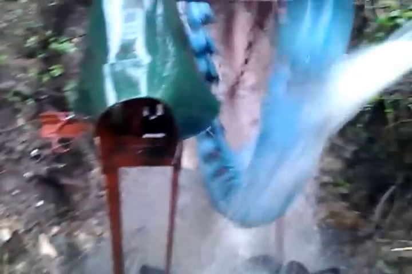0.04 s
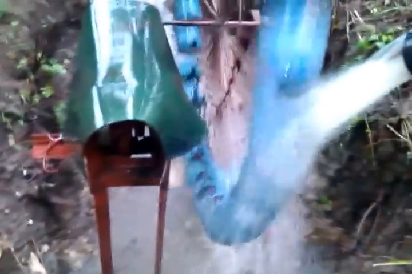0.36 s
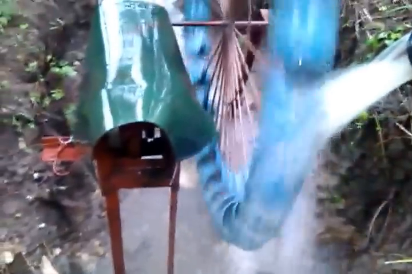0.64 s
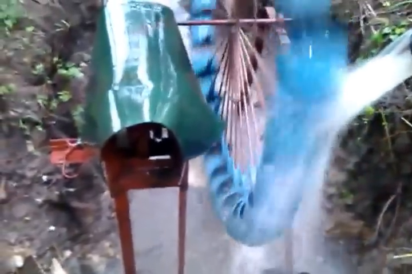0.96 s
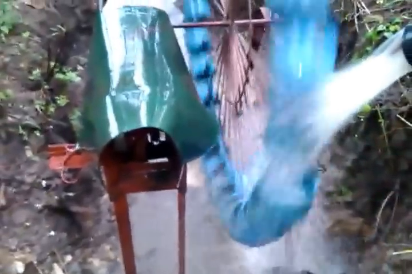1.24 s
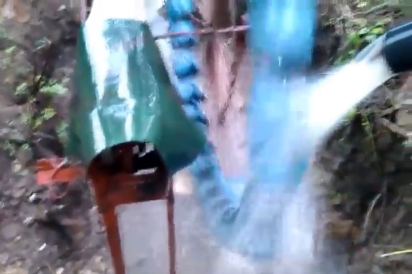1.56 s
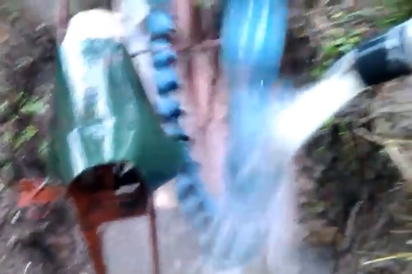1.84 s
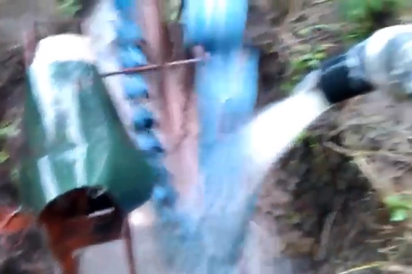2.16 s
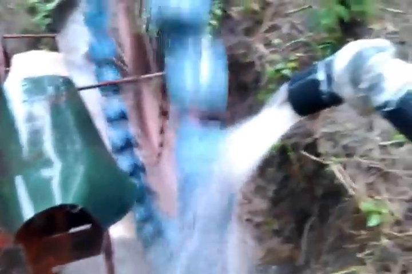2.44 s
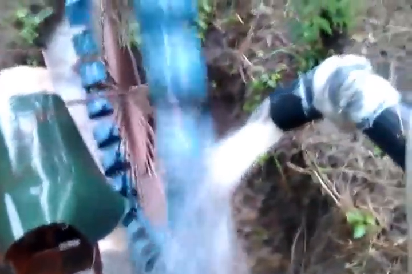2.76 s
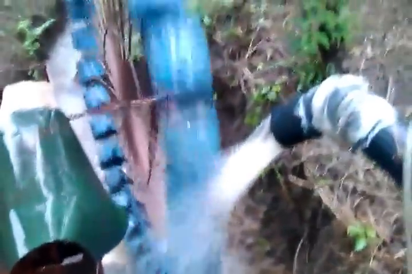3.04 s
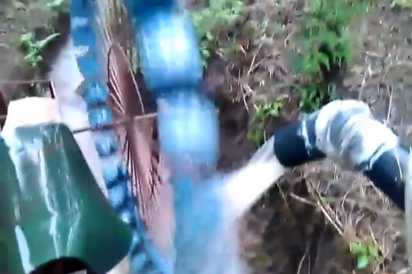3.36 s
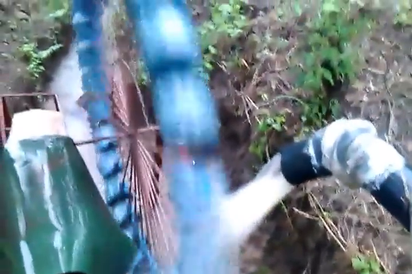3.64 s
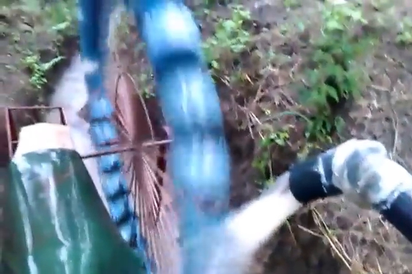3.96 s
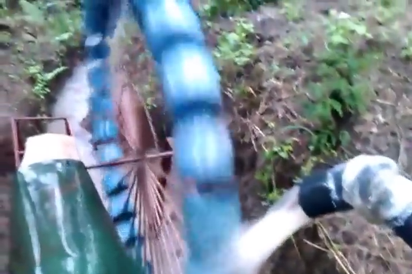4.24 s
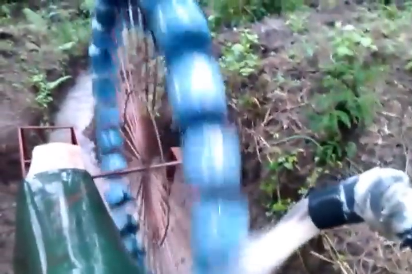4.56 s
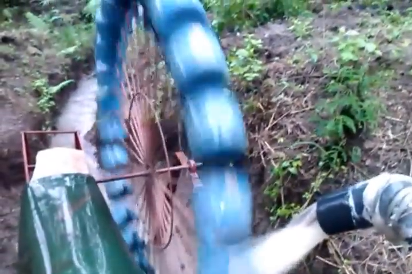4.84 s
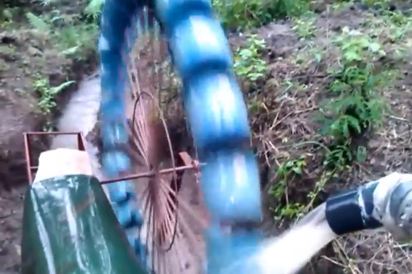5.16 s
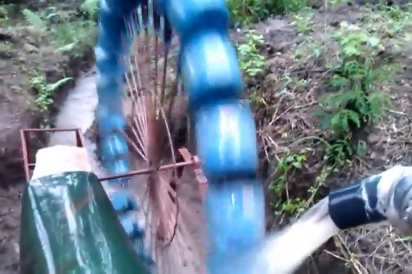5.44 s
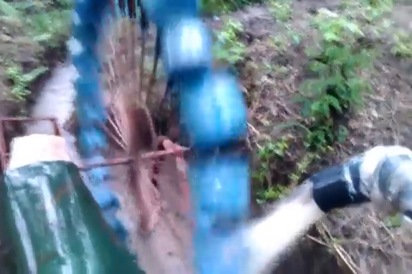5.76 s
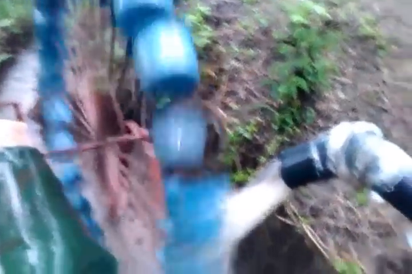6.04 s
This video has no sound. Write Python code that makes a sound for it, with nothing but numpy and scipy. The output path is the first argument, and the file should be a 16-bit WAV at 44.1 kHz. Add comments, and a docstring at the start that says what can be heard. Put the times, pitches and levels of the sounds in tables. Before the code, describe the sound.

After a brief silence, gushing water hits a turning bucket wheel close by, making a fast, pulsing splash with bubbling underneath and a barely audible generator hum. A few sharp handling clicks and a dull bump come about two seconds in, and the splashing changes tone as the microphone moves above the wheel. Outdoor wind buffets it now and then. Several big drops smack toward the end, along with a last tick.

```python
"""Outdoors, a thick water jet gushes from a pipe onto the buckets of a wheel driving a small generator.
After 0.65 s of silence, the buckets cut the jet about 5.4 times a second: spray hisses, each cup
rings and spent water churns below, over a faint hum. Around 2 s the hand-held camera ticks and bumps,
then climbs from beside the wheel to above it, and the water's tone shifts. Gusts buffet the
microphone, hardest at 5 s. Near the end, a few large drops smack and the camera ticks once more."""
import sys
import numpy as np
from scipy import signal
from scipy.fft import rfft, irfft
from scipy.io import wavfile
from scipy.ndimage import uniform_filter1d

SR = 44100
rng = np.random.default_rng(int(sys.argv[2]) if len(sys.argv) > 2 else 0)


def unload_wav(signal):
    """Save mono or channel-first audio to the path in sys.argv[1] as 16-bit WAV at rate SR, clipped to [-1, 1]."""
    wavfile.write(
        sys.argv[1],
        SR,
        np.round(np.clip(np.atleast_2d(signal).T, -1, 1) * 32767).astype(np.int16),
    )


N = 273420
TIME = np.arange(N) / SR
EDGE_HZ = 7290  # the highest pitch the microphone picks up

# The tone of flying spray. Each row: frequency in Hz, level in dB.
SPRAY_TONE = [(300, -21.5), (1100, -10.5), (1600, -7), (3400, -2.5), (4000, -3), (4700, -4.5), (5500, -0.5),
              (6100, -1.5), (6900, 1.5), (7300, -7.5)]


def gain_of(db):
    """Turns decibels into a number to multiply a sound by."""
    return 10 ** (np.asarray(db) / 20)


def evened(x):
    """Scales a signal so that its average strength (rms) is 1."""
    return x / np.sqrt(np.mean(x ** 2) + 1e-20)


def curves(rows):
    """Joins rows that start with a time in seconds into one curve for each other column."""
    times, *columns = np.transpose(rows)
    return [np.interp(TIME, times, column) for column in columns]


def add(mix, start_s, sound):
    """Mixes a sound in at the given time."""
    part = mix[round(start_s * SR):][:len(sound)]
    part += sound[:len(part)]


def coloured(x, tone):
    """Shapes a sound by rows of Hz and dB, cuts it at the microphone's edge and evens it."""
    hz = np.fft.rfftfreq(N, 1 / SR)
    tone_hz, tone_db = np.transpose(tone)
    gain = gain_of(np.interp(np.log(hz + 1), np.log(tone_hz), tone_db))
    return evened(irfft(rfft(x) * gain * (hz < EDGE_HZ), N))


def wander(rate_hz):
    """A smooth random drift of strength 1, mostly slower than the given rate."""
    hz = np.fft.rfftfreq(N, 1 / SR)
    return evened(irfft(rfft(rng.standard_normal(N)) * (hz > 0) / (1 + (hz / rate_hz) ** 4), N))


def resonate(x, hz, width_hz):
    """Makes a sound ring around a pitch, which may move."""
    turn = np.exp(2j * np.pi * np.cumsum(hz * np.ones(len(x))) / SR)
    fade = np.exp(-np.pi * width_hz / SR)
    return 2 * (turn * signal.lfilter([1 - fade], [1, -fade], x / turn)).real


def impacts(per_s, spread_db):
    """Tiny hits at random times, most small and a few large."""
    size = gain_of(spread_db * np.minimum(rng.exponential(1, N), 4))
    return evened(size * rng.choice([-1, 1], N) * (rng.random(N) < per_s / SR))


def by_position(beside, above):
    """Slides from one value toward the other as the camera climbs."""
    # Each row: time in seconds, camera position (0 is beside the wheel, 1 is above it).
    climb = [(1.9, 0), (2.7, 0.53), (3.5, 0.9)]
    return beside + (above - beside) * curves(climb)[0]


def bucket_pulse(between_db, rise_s, hold_s, delay_s):
    """The wheel's beat: each bucket enters the jet fast and leaves slowly; some water splashes between."""
    # Each row: time in seconds, buckets passing per second.
    wheel_speed = [(0.66, 5.48), (1.25, 5.844), (1.6, 5.448), (3.65, 5.456), (4.05, 4.784), (4.5, 5.72),
                   (6.2, 5.18)]
    passed = np.cumsum(curves(wheel_speed)[0]) / SR
    passed -= np.interp(0.673, TIME, passed)  # one bucket enters at 0.673 s
    age = np.arange(round(SR / 2)) / SR
    blow = (1 - np.exp(-age / rise_s)) * np.exp(-(age / hold_s) ** 2)
    power = np.full(N, gain_of(between_db) ** 2)
    for entry_s in TIME[1:][np.diff(np.floor(passed)) > 0]:
        add(power, entry_s + delay_s, blow ** 2)
    return evened(np.sqrt(power))


def generator(base_hz):
    """The generator hums faintly, its pitch wavering a little."""
    # Each row: multiple of the base pitch, level in dB.
    hum_notes = [(2, -55), (3, -51), (4, -54)]
    cycles = np.cumsum(base_hz * (1 + 0.011 * wander(rate_hz=5))) / SR
    return sum(gain_of(db) * evened(np.sin(2 * np.pi * multiple * cycles)) for multiple, db in hum_notes)


def wind():
    """Moving air rumbles on the microphone: a light breeze, and gusts that swell and fade."""
    # Each row: frequency in Hz, level of the rumble in dB.
    rumble_tone = [(8, -12.5), (18, 1), (35, -1.5), (60, -1.5), (85, -4.5), (120, -16), (220, -34.5),
                   (500, -54)]
    # Each row: time in seconds, level in dB.
    breeze_levels = [(0.66, -53), (2.7, -49), (4.3, -41.5), (6.2, -50)]
    # Each row: time of the peak in seconds, peak level in dB, half length in seconds.
    gusts = [(1.538, -40, .035), (2.28, -41.5, 0.035), (3.465, -40.5, .045), (3.928, -38.5, 0.11),
             (4.607, -44, 0.043), (5.044, -32, 0.038), (5.88, -41, 0.038), (6.136, -38, 0.021)]
    air = coloured(rng.standard_normal(N), rumble_tone)
    air /= np.sqrt(uniform_filter1d(air ** 2, size=10000))  # steady the noise's own slow swells
    gust_power = sum((gain_of(db) * np.exp(-((TIME - s) / half_s) ** 2 / 2)) ** 2 for s, db, half_s in gusts)
    return np.sqrt(gain_of(curves(breeze_levels)[0]) ** 2 + gust_power) * air


def camera_ticks(case_hz, case_fade_s):
    """Each tick on the camera is a snap, a brief ring of its case and a rattle."""
    # Each row: start in seconds, snap level in dB, rattle level in dB, rattle fade time in seconds.
    ticks = [(1.6027, 3, -10, .0007), (2.0032, .3, -12, .0007), (2.1272, -14, -20, .002),
             (5.9856, -1.5, -11, .001)]
    # Each row: frequency in Hz, level in dB.
    rattle_tone = [(300, -17.5), (1500, -16), (3000, -2), (5000, 0), (6300, 8), (7300, -4)]
    out, lead_s = np.zeros(N), 12 / SR
    age = np.arange(4096) / SR - lead_s
    after = np.maximum(age, 0)
    case = np.cos(2 * np.pi * case_hz * age) * np.exp(-after / case_fade_s) * (age >= 0)
    push, rebound = np.sinc(2 * EDGE_HZ * age), np.sinc(2 * EDGE_HZ * (age - .00011))
    snap = .7 * push - .5 * rebound + .25 * case
    chatter = np.tanh(coloured(rng.standard_normal(N), rattle_tone))  # loose parts have little room
    for s, snap_db, rattle_db, fade_s in ticks:
        shake = (1 - np.exp(-(after / .0003) ** 2)) * np.exp(-after / fade_s)
        rattle = evened(np.roll(chatter, -round(s * SR))[:len(age)]) * shake
        add(out, s - lead_s, gain_of(snap_db) * snap + gain_of(rattle_db) * rattle)
    return out


def hand_bump():
    """The hand bumps the camera with a low, dull thud."""
    # Each row: start in seconds, level in dB, pitch in Hz, seconds to fade by 60 dB.
    thud_notes = [(1.9895, -20.5, 225, .055), (1.9898, -11, 420, .012)]
    out, age = np.zeros(N), np.arange(4096) / SR
    for s, db, hz, fade_s in thud_notes:
        phase = 2 * np.pi * hz * age
        add(out, s, gain_of(db - 60 * age / fade_s) * np.cos(phase) * (1 - np.exp(-phase)))
    return out


def glugs(swell_s, ring_s, rise_per_s):
    """Each big bubble swells, rings and climbs a little in pitch as it nears the surface."""
    # Each row: start in seconds, peak level in dB, starting pitch in Hz.
    big_bubbles = [(1.060, -32, 1003), (1.764, -30.5, 902), (1.836, -33, 814), (2.032, -28.5, 996),
                   (2.143, -31, 940), (2.255, -31.5, 220), (2.335, -31, 282), (2.367, -30.5, 485),
                   (3.172, -28.5, 334), (3.53, -30, 469), (3.784, -30, 477), (4.912, -32.5, 215),
                   (5.215, -32, 563)]
    out, age = np.zeros(N), np.arange(round(SR / 10)) / SR
    shape = (1 - np.exp(-age / swell_s)) * np.exp(-age / ring_s)
    for s, db, hz in big_bubbles:
        note = np.sin(2 * np.pi * hz * age * (1 + rise_per_s * age / 2))
        add(out, s, gain_of(db) * shape / shape.max() * note)
    return out


def churn(bubble_share, ring_cycles, glide, slosh_db):
    """Spent water gushes off the wheel, full of short rising bubble notes, swelling after each bucket."""
    # Each row: time in seconds, level in dB.
    pour_levels = [(0.65, -33), (0.8, -34.5), (0.97, -32), (1.22, -33.5), (2.0, -33), (2.38, -32.5),
                   (2.5, -34), (3.7, -35.5), (3.8, -32.5), (4.15, -34.5), (6.2, -34)]
    # Each row: frequency in Hz, level in dB from beside the wheel, level in dB from above it.
    churn_tones = [(80, -11, -30.5), (166, -7.5, -4.5), (245, -2, -5.5), (295, 1.5, -2), (435, -3, 0),
                   (453, 1, 1.5), (611, -4, -1.5), (635, -5.5, -9.5), (774, -3, -5), (864, 0.5, -1.5),
                   (997, -0.5, -0.5), (1240, -12, -8.5), (1520, -3.5, -10.5), (2400, -28.5, -23.5)]
    bubbles = np.zeros(N)
    for hz in np.geomspace(230, 1700, 40):
        cycles = np.arange(round(4 * ring_cycles * SR / hz)) * hz / SR
        shape = np.exp(-cycles / ring_cycles) * (1 - np.exp(-cycles / 2))
        note = shape * np.sin(2 * np.pi * cycles * (1 + glide * cycles / ring_cycles))
        bubbles += np.sqrt(hz) * evened(signal.oaconvolve(impacts(per_s=30, spread_db=2), note)[:N])
    gush, water = rng.standard_normal(N), np.zeros(N)
    tone_hz, beside_db, above_db = np.transpose(churn_tones)
    for weight, tone_db in (by_position(1, 0), beside_db), (by_position(0, 1), above_db):
        tone = np.transpose([tone_hz, tone_db])
        water += weight * np.sqrt(bubble_share) * coloured(bubbles, tone)
        water += weight * np.sqrt(1 - bubble_share) * coloured(gush, tone)
    pour = bucket_pulse(between_db=2, rise_s=.013, hold_s=.071, delay_s=.013)
    return gain_of(curves(pour_levels)[0] + slosh_db * wander(rate_hz=20)) * pour * water


def smacks(rise_s, spatter_db, spatter_s):
    """A large drop lands with a very short note, then scatters into fine spatter."""
    # Each row: start in seconds, level in dB, pitch in Hz, fade time in seconds.
    large_drops = [(3.0297, -9.5, 2780, 0.002), (5.1343, -3.5, 4300, 0.001), (5.779, -12.5, 6000, .001),
                   (5.8456, -11.5, 5460, 0.0012), (6.048, -2.5, 6300, 0.00077)]
    out, age = np.zeros(N), np.arange(2048) / SR
    spatter = coloured(rng.standard_normal(N), SPRAY_TONE)
    onset = 1 - np.exp(-(age / rise_s) ** 2)
    for s, db, hz, fade_s in large_drops:
        note = np.sin(2 * np.pi * hz * age) * np.exp(-age / fade_s)
        scatter = gain_of(spatter_db) * spatter[round(s * SR):][:len(age)] * np.exp(-age / spatter_s)
        add(out, s, gain_of(db) * onset * (note + scatter))
    return out


def water_bursts(rise_s):
    """Big lumps of water burst on the wheel. Gives two boosts: one for the spray, one for the cup."""
    # Each row: start in seconds, extra spray and extra cup ring in dB (0 adds as much power
    # as the usual splash has), length in seconds.
    bursts = [(.81, -14.5, 4, 0.057), (1.07, -4, -1.5, 0.044), (1.787, 0.5, -3.5, 0.057),
              (2.108, -0.5, -2, .04), (2.665, -2, -11.5, .06), (3.25, 1, -12, 0.039), (3.462, 0, -8, 0.026),
              (3.568, -2.5, -2.5, 0.073), (3.739, 2.5, -8, 0.024), (4.212, 1.5, -6, 0.064),
              (4.7, -3, -6.5, 0.083), (4.831, -12.5, 4, .03), (5.45, -6.5, 4, 0.035),
              (5.68, -10, -0.5, .06), (5.827, -4, -1, 0.078), (5.975, 1, -13.5, .03)]
    spray_power, cup_power = np.ones(N), np.ones(N)
    age = np.arange(round(SR / 2)) / SR
    for s, spray_db, cup_db, length_s in bursts:
        shape = (1 - np.exp(-age / rise_s)) * np.exp(-(age / length_s) ** 4)
        add(spray_power, s, (gain_of(spray_db) * shape) ** 2)
        add(cup_power, s, (gain_of(cup_db) * shape) ** 2)
    return np.sqrt(spray_power), np.sqrt(cup_power)


def tearing_sheets(x, depth_db, tilt_db_per_octave):
    """Tearing sheets of water make patches of the hiss flicker; the tilt brightens it."""
    hz, times, spectrum = signal.stft(x, SR, nperseg=256, noverlap=192)
    patches = uniform_filter1d(rng.standard_normal(spectrum.shape), size=5, axis=0)  # blur across pitch
    patches = evened(uniform_filter1d(patches, size=12, axis=1))  # blur across time
    octaves = np.log2(np.maximum(hz, 1500) / 4000)[:, None]
    spectrum *= gain_of(depth_db * patches + octaves * np.interp(times, TIME, tilt_db_per_octave))
    return evened(signal.istft(spectrum, SR, nperseg=256, noverlap=192)[1][:N])


def spray_hiss(fizz_hz):
    """Thousands of drops hiss on the buckets, and the jet fizzes where it meets the rim."""
    drops = coloured(impacts(per_s=18000, spread_db=3.5), SPRAY_TONE)
    spray = tearing_sheets(drops, depth_db=1.5, tilt_db_per_octave=by_position(beside=0, above=1.54))
    fizz = resonate(rng.standard_normal(N), fizz_hz, width_hz=980)
    fizz = evened(resonate(fizz, fizz_hz, width_hz=980))
    return spray + gain_of(by_position(beside=-6.5, above=-25.5)) * fizz


def cup_ring():
    """Drops ring the hollow of a bucket, while the water in it keeps shifting the pitch."""
    cup_hz = by_position(beside=2286, above=2580) * (1 + 0.028 * wander(rate_hz=55))
    ring = resonate(impacts(per_s=11000, spread_db=2.5), cup_hz, width_hz=1110)
    return resonate(ring, cup_hz, width_hz=1050)


def jet_on_wheel():
    """The jet arrives in lumps and strikes bucket after bucket, so the hiss and the ring throb."""
    # Each row: time in seconds, spray level in dB, cup ring level in dB.
    splash_levels = [(0.65, -26, -30), (1.25, -27.5, -32.5), (1.4, -25, -27.5), (1.55, -29, -31.5),
                     (2.3, -27, -28.5), (2.45, -28.5, -29), (3.2, -25.5, -28.5), (3.35, -28, -29),
                     (3.5, -24, -26.8), (3.95, -27.5, -28), (4.55, -28, -27.5), (4.7, -26.5, -26.5),
                     (5.6, -26.62, -28.5), (5.75, -27.5, -26), (6.05, -26, -27.5), (6.2, -25.5, -25)]
    spray_db, ring_db = curves(splash_levels)
    spray_boost, cup_boost = water_bursts(rise_s=.006)
    lumps = gain_of(1.31 * wander(rate_hz=120))
    hiss = evened(spray_boost * spray_hiss(fizz_hz=6350)) * gain_of(spray_db)
    hiss *= bucket_pulse(between_db=-1.5, rise_s=.022, hold_s=.13, delay_s=.002)
    ring = evened(cup_boost * cup_ring()) * gain_of(ring_db)
    ring *= bucket_pulse(between_db=-2, rise_s=.02, hold_s=.14, delay_s=.016)
    return lumps * (hiss + ring)


def scene():
    """All the sounds meet at one microphone."""
    water = jet_on_wheel() + smacks(rise_s=.00014, spatter_db=-11, spatter_s=.003)
    water += churn(bubble_share=.48, ring_cycles=6.94, glide=.02, slosh_db=1.12)
    water += glugs(swell_s=.0076, ring_s=.014, rise_per_s=.91)
    handling = camera_ticks(case_hz=7100, case_fade_s=.00053) + hand_bump()
    return (water + generator(base_hz=69.6) + wind() + handling)[None]


def record(dry):
    """The recorder switches on, cuts the highest treble and flattens peaks that are too loud."""
    start_s, top_hz = .6515, 16000
    opened = dry * np.clip((TIME - start_s) / .002, 0, 1)
    edge_filter = signal.firwin(1023, EDGE_HZ, window=("kaiser", 8), fs=SR)[None]
    top_filter = signal.firwin(255, top_hz, window=("kaiser", 8), fs=SR)[None]
    clipped = np.clip(signal.oaconvolve(opened, edge_filter, "same"), -1, 1)
    return signal.oaconvolve(clipped, top_filter, "same")


dry = scene()
out = record(dry)
unload_wav(out)
```